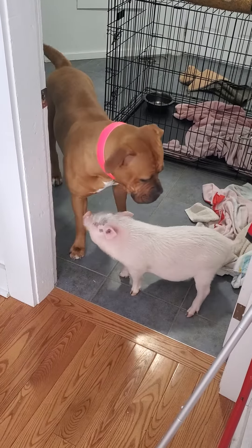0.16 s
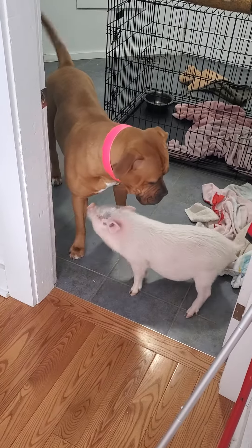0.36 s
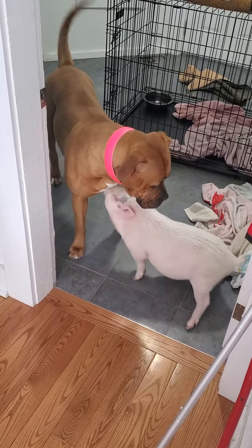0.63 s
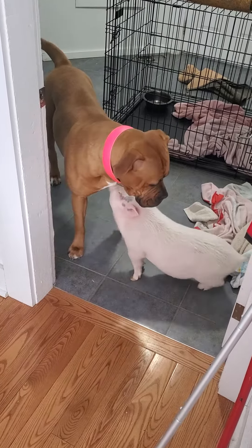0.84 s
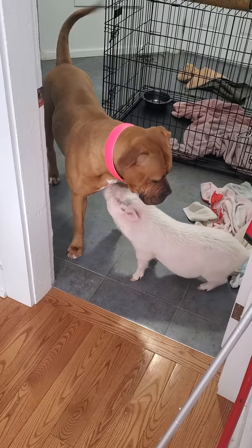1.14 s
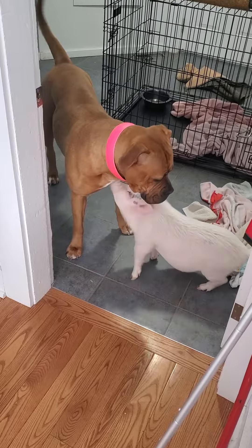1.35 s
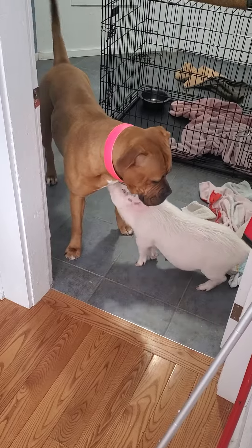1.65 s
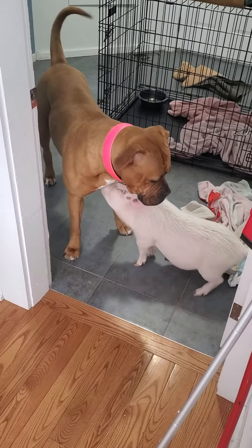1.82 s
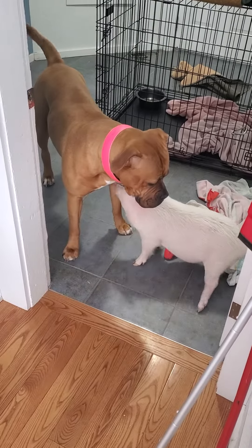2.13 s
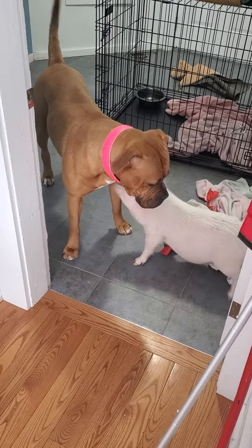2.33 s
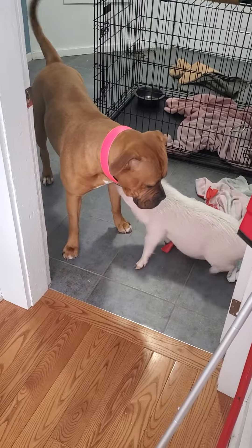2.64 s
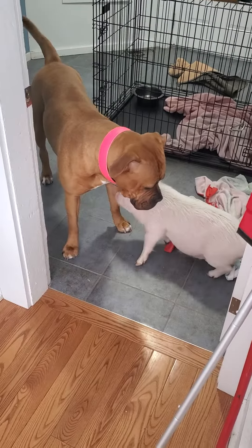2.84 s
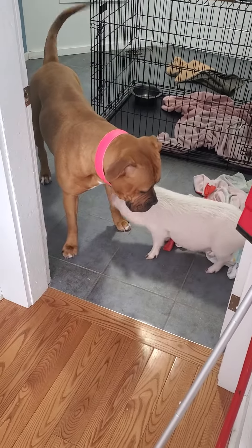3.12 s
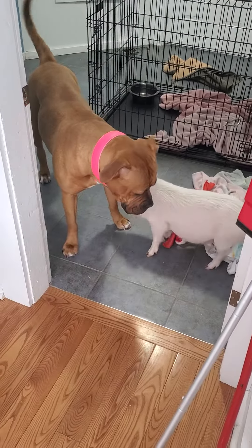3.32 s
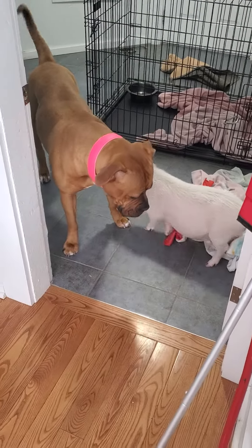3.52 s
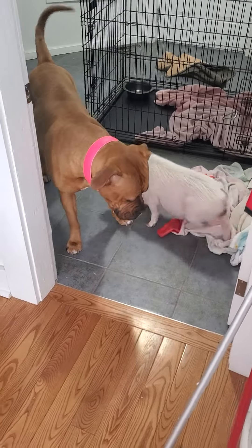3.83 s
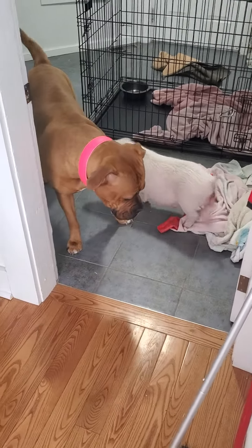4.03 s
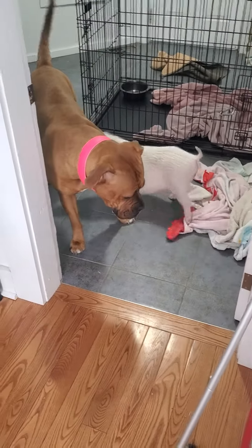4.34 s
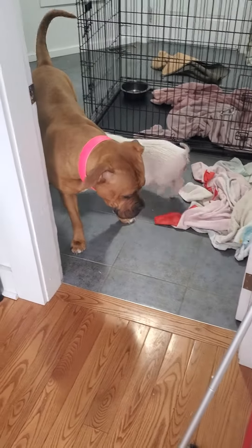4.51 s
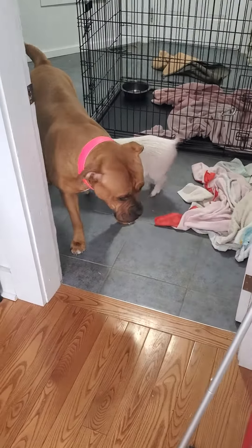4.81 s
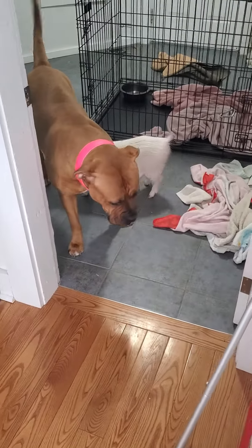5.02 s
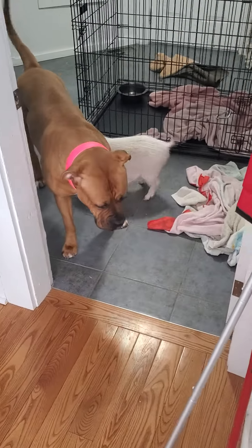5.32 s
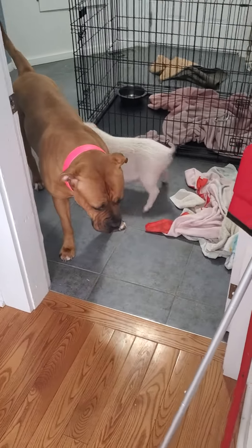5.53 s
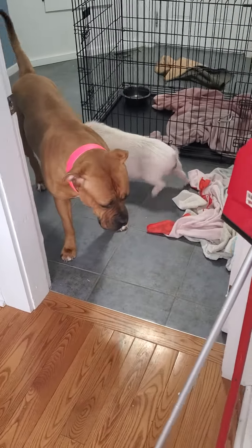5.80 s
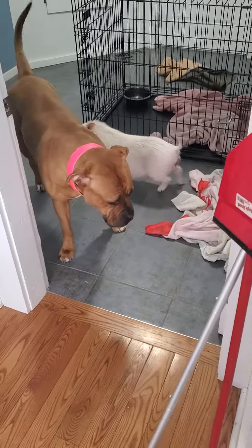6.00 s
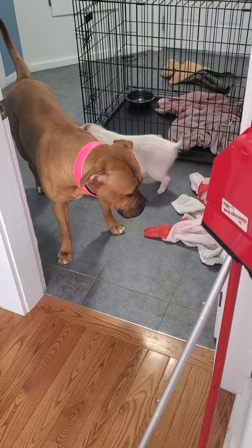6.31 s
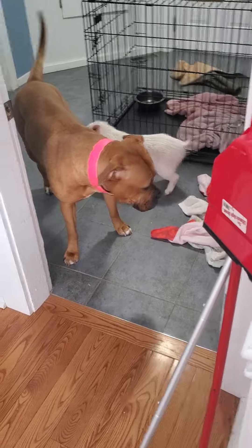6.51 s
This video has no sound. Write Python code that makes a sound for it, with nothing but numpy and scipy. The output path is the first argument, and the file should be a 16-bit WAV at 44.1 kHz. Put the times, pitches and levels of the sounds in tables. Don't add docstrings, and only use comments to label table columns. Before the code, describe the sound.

Close stereo microphone in a small hard tiled room, with quiet low hum, room air and very faint hiss. The first half second is almost still: tiny hoof taps and a soft floor thud. At 0.6-0.9 s come a firm tick, gritty scuff and breathy snorts, with a pinched whistling sniff. Light taps and a scrape follow at 1.25-1.5 s, then soft rustling. A strong sharp sniff comes at 2.25 s, muffled puffs follow, and the loudest hoof strike cracks at 2.74 s with a low thump. After a lull around 3 s, slides, sniffs and quick claw ticks scatter from 3.4 to 4.6 s. A full snort swells at 4.8 s. From 5.4 to 6.1 s, two hard ticks, a scuff, thuds and longer sniffs crowd together, then weak puffs and rustle fade toward 6.6 s.

```python
import sys
import numpy as np
from scipy import signal
from scipy.fft import rfft, irfft
from scipy.io import wavfile
from scipy.ndimage import uniform_filter1d

SR = 44100
rng = np.random.default_rng(int(sys.argv[2]) if len(sys.argv) > 2 else 0)


def master(y):
    cut = np.clip(np.atleast_2d(y).T, -1, 1)
    pcm = np.round(cut * 32767)
    wavfile.write(sys.argv[1], SR, pcm.astype(np.int16))


def elevation(decibels):
    levels = np.asarray(decibels, float)
    return 10 ** (levels / 20)


N = 293823

# t/s, hold/s, level/dB, cloth and chest part/dB rel, thin hiss/dB rel
SLIDES = [(.268, 0.05, -63.5, -4, -12), (.378, 0.037, -53.5, -1, -12.5), (.727, 0.018, -41.5, -9, -17.5),
          (1.253, 0.03, -53, -5.5, -9.5), (1.456, 0.057, -44.5, -8, -14.5), (2.658, 0.0057, -48, -14, -8.5),
          (2.738, 0.0014, -36, 0, -5.5), (3.47, 0.062, -41.5, -13, -15.5), (3.63, 0.026, -43, -14.5, -16),
          (3.741, 0.021, -40, -12, -10.5), (3.811, 0.025, -51.5, -5, -11), (3.891, 0.031, -60, 1, -8),
          (4.076, 0.0051, -52.5, -16, -15), (4.164, 0.039, -48, -14, -9.5), (4.3, 0.038, -51, -11.5, -12.5),
          (4.601, 0.017, -48.5, -4.5, -16.5), (5.189, 0.028, -60, 2, -23), (5.215, 0.013, -54.5, -3, -15.5),
          (5.57, 0.069, -39, -12, -10)]
# t/s, swell/s,
# level/dB, cloth and chest part/dB rel, thin hiss/dB rel
SNORTS = [(.585, 0.0067, -48.5, -6, -16), (1.091, 0.0038, -61.5, -6, -15), (.83, 0.052, -42, -20, -27),
          (2.35, 0.081, -44, 0.5, -12), (2.44, 0.045, -45.5, 5.5, -17), (2.635, 0.035, -49.5, -8, -20),
          (2.74, 0.045, -49.5, -16, -32), (4.31, 0.064, -59, -6, -0.5), (4.63, 0.022, -58.5, 0, -27),
          (4.79, 0.07, -38.5, -6, -16), (4.96, 0.042, -61.5, 3, -17), (5.63, 0.09, -51.5, 2, -6.5),
          (5.87, 0.081, -47, -2.5, -22), (6.01, 0.11, -46.5, -10, -12), (6.238, 0.011, -51.5, -4, -16.5),
          (6.41, 0.1, -55.5, -5.5, -12)]
# t/s, swell/s, level/dB, cloth and chest part/dB rel, thin hiss/dB rel
SNIFFS = [(.775, 0.064, -51, -10, -22), (.815, 0.059, -37.5, -3.5, -10), (1.444, 0.008, -50, -10, -14),
          (2.247, 0.047, -34, -10.5, -14), (3.432, 0.027, -40.5, -8.5, -18),
          (3.99, 0.029, -55.5, -25, -12.5), (4.489, 0.017, -61, -2.5, 2), (4.755, 0.031, -44.5, -21, -12),
          (5.425, 0.035, -52, -13, -8.5), (5.45, 0.086, -41, -13, -13), (5.835, 0.041, -36, -17, -12)]
# t/s, swell/s, level/dB, cloth and chest part/dB rel, thin hiss/dB rel
RUSTLES = [(0.0, 0.042, -62, 9, -3), (.33, 0.052, -76, 1, 1), (.46, 0.15, -69.5, 17.5, 0),
           (.64, 0.048, -63, 10.5, -6), (1.58, 0.035, -85, 14, -18), (1.76, 0.044, -68.5, 6.5, 9),
           (1.86, 0.082, -61, 4.5, 8), (1.95, 0.13, -60.5, -12, 2), (2.03, 0.064, -56, 7, -27),
           (2.54, 0.074, -64.5, 1, -3), (2.59, 0.034, -60.5, 6.5, -5), (2.9, 0.05, -64.5, 13.5, -10),
           (2.98, 0.024, -74.5, -10, 13.5), (4.4, 0.03, -69, -9, 4), (5.71, 0.12, -58, 9, -5),
           (6.17, 0.043, -67, 0, -13), (6.3, 0.058, -64, 3, -3.5), (6.55, 0.055, -59.5, 2.5, -6.5)]
# curve of the swell, fall/dB per s, open-snout part/dB rel, left-right/dB
SLIDE_SHAPE = (0.03, 235, -5.5, 0.5)
SNORT_SHAPE = (0.74, 211, 2.4, 0.84)
SNIFF_SHAPE = (1.28, 202, -6.5, 1.7)
RUSTLE_SHAPE = (0.53, 170, 0.41, 0.72)
# level/dB, cloth/dB rel, open snout/dB rel, hiss/dB rel, left-right/dB
STILL = (-86, 5.5, -17, -1.5, 6)
# f/Hz, level/dB per Hz
AIR = [(180, -28), (300, -12), (520, -9.5), (720, -5.5), (1200, -2.5), (1930, -3.5), (4160, -3.5),
       (7820, -8.5), (16000, -13.5)]
CAVITIES_HZ = [255, 428, 496, 682, 821, 1022, 1299, 1620, 1720, 1975, 2510, 2728, 3990, 3745, 4110, 4290,
               6020]
# t/s, length/s, f/Hz, width/Hz,
# level/dB
WHISTLES = [(.3, .04, 11000, 7000, -63), (.84, .055, 4200, 800, -45), (1.28, .043, 1840, 110, -64),
            (1.61, .093, 1200, 300, -62), (1.648, .065, 1700, 200, -64), (1.77, .06, 10000, 8000, -64),
            (2.283, .03, 4100, 900, -43), (2.62, .02, 7000, 5000, -62), (2.745, .075, 1850, 250, -45),
            (4.492, .06, 4100, 1300, -59), (2.742, .08, 1250, 300, -47), (2.742, .07, 2380, 250, -51),
            (3.457, .035, 4000, 600, -45), (3.743, .02, 4050, 500, -45), (.848, .03, 1740, 120, -52),
            (.366, .008, 1200, 600, -58), (6.09, .06, 1950, 400, -54), (1.092, .03, 2000, 500, -63),
            (4.077, .07, 1650, 250, -59)]
# t/s, peak level/dB, ring f/Hz, left-right/dB, dull part/dB rel
HOOVES = [
    (0.0544, -61, 1620, 6, 3),
    (0.2678, -53, 3220, -5, 4),
    (0.378, -44, 4940, 15, -11),
    (0.7267, -38, 4850, -2, -3),
    (1.2526, -46, 5160, 19, -9),
    (2.7382, -32, 1700, -14, 0),
    (2.7399, -23, 1850, 1, -2),
    (3.8911, -45, 1820, -11, 0),
    (5.903, -32.5, 2220, -5, -1),
]
# t/s, peak level/dB, ring f/Hz, left-right/dB
CLAWS = [(1.2627, -44, 4000, -16), (1.4576, -52, 2160, -1), (2.659, -39, 1610, 10), (3.637, -47, 4530, -7),
         (3.741, -32.5, 4130, 3), (3.8118, -39, 3300, -2), (4.0762, -42.5, 3560, -16.5),
         (4.1645, -31, 3640, -14), (4.3004, -44, 6170, 14), (4.346, -46, 3450, -18),
         (4.4902, -43, 4000, 11.5), (4.602, -36, 3700, -1), (4.9965, -49, 3730, -15),
         (5.189, -63, 3670, -27), (5.2143, -53, 3850, -20), (5.524, -33, 2440, -1), (5.571, -33, 4520, 6),
         (5.957, -39, 8950, -14)]
# t/s, peak level/dB, f/Hz
THUDS = [(0.411, -36.5, 92.4), (0.445, -43, 91), (0.789, -38, 49.4), (1.011, -48, 54.6), (1.296, -41.5, 64),
         (1.33, -48, 90), (1.467, -46, 68.5), (2.087, -47, 107), (2.415, -51, 58), (2.503, -40, 79.5),
         (2.633, -40.5, 76.7), (2.777, -32, 91.9), (3.029, -61, 64.6), (3.613, -36, 57.5),
         (3.85, -42, 60.4), (3.997, -43, 65.4), (4.192, -42, 52), (4.282, -50, 89), (4.884, -58, 46),
         (4.894, -51, 102), (5.534, -43, 51.7), (5.654, -34, 98.5), (5.69, -38, 61.7), (5.7, -43, 171),
         (6.111, -42.5, 73), (6.525, -47.5, 76)]
# t/s, boom level/dB, knock level/dB
SHIFTS = [(0.0, -59, -52.5), (0.279, -77, -53.5), (0.432, -46.5, -55.5), (.63, -77, -49.5),
          (.73, -62, -49.5), (.84, -51.5, -50.5), (1.32, -55.5, -74), (1.91, -68, -55.5), (2.1, -57, -58.5),
          (2.42, -44.5, -56), (2.58, -55, -46.5), (2.67, -49, -72), (2.75, -60, -48.5), (2.8, -46.5, -44.5),
          (3.0, -68, -72), (3.62, -48.5, -62.5), (3.76, -50.5, -63.5), (4.2, -64, -56), (4.34, -51, -55.5),
          (4.64, -57.5, -58), (4.93, -49, -78), (5.27, -76, -62), (5.58, -67, -56), (5.69, -41, -50.5),
          (5.82, -48, -49), (5.99, -46.5, -50), (6.15, -60, -76), (6.55, -52.5, -59.5)]
# f/Hz, T60/s
ROOM_T60 = [(300, 0.26), (1000, 0.23), (3000, 0.24), (7000, 0.057), (14000, 0.028)]
# f/Hz, level/dB
MIC = [(20, -34), (50, -2.5), (90, 1.5), (6800, -1), (7200, -8), (13000, -4.5), (13600, -13.5),
       (15750, -11), (15900, -62)]
# f/Hz, left-right/dB
PORT_BALANCE = [(60, -0.5), (500, -3.5), (1290, 1.5), (2380, -0.5), (4400, 1.5), (8000, -2), (15000, 4.5)]
# f/Hz, left-right likeness (1 = same)
LIKENESS = [(60, 1), (130, 0.85), (290, 0.99), (640, 0.69), (1410, 0.16), (3100, 0.0026), (6820, 0.049),
            (15000, 0.46)]
# f/Hz, level/dB per Hz
FLOOR = [(18, -34), (35, -8), (65, -2), (100, -5.5), (180, -7), (300, -19.5), (450, -21), (4400, -58),
         (9680, -120)]
# f/Hz, level/dB per Hz
HISS = [(4300, -10), (4750, 1), (6850, 4), (7200, -54), (8500, -9), (10500, -17), (13000, -7), (15500, -21)]

EDGES = 150 * 2 ** np.arange(0, 6.9, .4)
STEP = 32
LOWS_LINGER_DB_PER_S, TAIL_LEFT_DB_PER_S = 27, 52
SHIFT_RISE_DB_PER_S, SHIFT_FALL_DB_PER_S = 151, 138
REST_BOOM_DB, REST_KNOCK_DB = -65.5, -69
CLAW_DULL_DB, HOOF_ECHO_DB = -35, -5.5
HUM_HZ, HUM_DB, FLOOR_DB, HISS_DB = 120, -64, -59, -73
DIRECT_SHARE, DIRECT_FROM_HZ = .3, 1000
RIGHT_LAG, LEFT_LAG = 17, 6


def snuffle(patchy_db=1.4, grain_db=1.3, streak_db=-4):
    level_db, cloth_db, open_db, hiss_db, pan_db = moves()
    flutter = grain_db * (.6 * drift(40.0) + drift(220.0))

    def gain_db_at(hz):
        low_share = np.clip(np.log2(1500 / hz) * 1.8, 0, 1)
        high_share = np.clip(np.log2(hz / 4500), 0, 1)
        open_share = np.clip(1 - 1.32 * abs(np.log2(hz / 1800)), 0, 1)
        colour = open_share * (open_db + 5) + low_share * (cloth_db + 5.0) + high_share * (hiss_db + 12.5)
        return colour + flutter + patchy_db * drift(5.3)

    air = stereo_bands(AIR, gain_db_at)
    streaks = 0
    for hz in CAVITIES_HZ:
        streaks = streaks + elevation(3.0 * drift(5.0) - 2) * resonate(air, hz, 30 + 0.01 * hz)
    return elevation(level_db - 1.0) * pan(pan_db) * (0.71 * air + elevation(streak_db) * streaks)


def moves():
    t = np.arange(N // STEP + 2) * STEP / SR
    still_db, *colour_db, still_pan_db = STILL
    total = elevation(still_db) ** 2 * np.ones(len(t))
    parts = total * elevation(np.array(colour_db)[:, None]) ** 2
    side = total * still_pan_db
    kinds = ((SLIDES, SLIDE_SHAPE), (SNORTS, SNORT_SHAPE), (SNIFFS, SNIFF_SHAPE), (RUSTLES, RUSTLE_SHAPE))
    for rows, (curve, fall, open_db, pan_db) in kinds:
        for s, length_s, db, cloth_db, hiss_db in rows:
            after = np.maximum(t - s - length_s, 0)
            swell = np.clip((t - s) / length_s, 0, 1) ** curve * (t > s)
            power = (swell * elevation(db - fall * after)) ** 2
            cloth = cloth_db + LOWS_LINGER_DB_PER_S * after
            total = total + power
            parts = parts + power * elevation(np.array([cloth, open_db + 0 * t, hiss_db + 0 * t])) ** 2
            side = side + power * (pan_db + TAIL_LEFT_DB_PER_S * after)
    total, side, *parts = uniform_filter1d([total, side, *parts], size=3, origin=1)
    level_db, parts_db = 10 * np.log10(total), 10 * np.log10(parts / total)
    return [smooth_up(c) for c in (level_db, *parts_db, side / total)]


def whistles():
    out = np.zeros((2, N))
    puffs = rng.standard_normal((len(WHISTLES), 2, 12000))
    for (s, length_s, hz, width_hz, db), air in zip(WHISTLES, puffs):
        tone = rms_one(resonate(resonate(air, hz, width_hz), hz, width_hz))
        t, at = np.arange(12000) / SR / length_s, round(s * SR)
        out[:, at:at + 12000] += elevation(db) * tone * np.clip(42.0 * t, 0, 1) * np.exp(-t ** 2)
    return out


def ticks(crack_db=-7.0, dull_s=0.0077):
    out, t = np.zeros((2, N)), np.arange(900) / SR
    rows = HOOVES + [(*row, CLAW_DULL_DB) for row in CLAWS]
    for (s, db, hz, pan_db, dull_db), grit in zip(rows, rng.standard_normal((len(rows), 900))):
        ring = .65 * np.sin(2 * np.pi * hz * t) * (t / .0006) ** 4 * np.exp(4 - t / .00015)
        crack = grit * np.exp(-t / .0015) * np.clip(t / .0007, 0, 1)
        crack = elevation(crack_db) * band(crack, 1200, min(4 * hz, 15000), order=1)
        knock = grit * np.exp(-t / dull_s) * np.clip(t / 0.00071, 0, 1)
        knock = elevation(dull_db - 3.5) * band(knock, 410, 1200)
        at = round(s * SR)
        out[:, at:at + 900] += elevation(db + 7.5) * pan(pan_db)[:, None] * (ring + crack + knock)
    return out


def boards(rise_s=0.0056, fall_s=0.036):
    boom_db, knock_db = weight()
    boom, knock = rng.standard_normal((2, 2, N))
    out = elevation(boom_db - 1) * rms_one(band(boom.sum(0) + .7 * boom, 45, 88))
    out = out + elevation(knock_db - 4.0) * rms_one(band(knock.sum(0) + .5 * knock, 126, 303))
    t = np.arange(int(.3 * SR)) / SR
    envelope = (1 - np.exp(-t / rise_s)) * np.exp(-t / fall_s)
    for (s, db, hz), shift in zip(THUDS, rng.normal(0, 0.057, len(THUDS))):
        swing = np.sin(2 * np.pi * hz * t + shift * np.array([[1], [-1]])) * envelope
        at = round(s * SR)
        out[:, at:at + len(t)] += elevation(db - 3.0) * swing[:, :N - at]
    return out


def weight():
    t = np.arange(N // STEP + 2) * STEP / SR
    power = elevation(np.array([[REST_BOOM_DB], [REST_KNOCK_DB]])) ** 2
    for s, *db in SHIFTS:
        away_db = np.maximum(SHIFT_RISE_DB_PER_S * (s - t), SHIFT_FALL_DB_PER_S * (t - s))
        power = power + elevation(np.array(db)[:, None] - away_db) ** 2
    return [smooth_up(c) for c in 10 * np.log10(power)]


def room(x):
    t = np.arange(int(.6 * SR)) / SR
    white = rng.standard_normal((2, len(t))) * np.clip((t - .002) / 0.00011, 0, 1)
    tail = 0
    for low, high in zip(EDGES[::2], EDGES[2::2]):
        t60 = at_hz(ROOM_T60, np.sqrt(low * high))
        tail = tail + band(white, low, high) * elevation(-60 * t / t60)
    tail = tail / np.sqrt(np.sum(tail ** 2) / 2)
    return signal.fftconvolve(x.mean(0, keepdims=True), tail, axes=1)[:, :N]


def arrive(x):
    return np.array([x[0], np.roll(x[1], RIGHT_LAG)])


def microphone(x):
    hz = np.maximum(np.fft.rfftfreq(N, 1 / SR), 1)
    return irfft(rfft(x) * elevation(at_hz(MIC, hz)) * pan(at_hz(PORT_BALANCE, hz)), N)


def background():
    hum_gain = np.sqrt(2) * elevation(HUM_DB + 2.0 * drift(3.6))
    hum = hum_gain * np.sin(2 * np.pi * HUM_HZ * np.arange(N) / SR)
    return hum + elevation(FLOOR_DB - 7.0) * steady_noise(FLOOR) + elevation(HISS_DB) * steady_noise(HISS)


def steady_noise(spectrum):
    hz = np.maximum(np.fft.rfftfreq(N, 1 / SR), 1)
    mid, side = rfft(rng.standard_normal((2, N)))
    gain = elevation(at_hz(spectrum, hz)) * (hz < spectrum[-1][0])
    return rms_one(irfft(gain * spread(mid, side, np.clip(at_hz(LIKENESS, hz), -1, 1)), N))


def stereo_bands(spectrum, gain_db_at):
    out, power, white = 0, 0, rng.standard_normal((2, 2, N))
    for k, (low, high) in enumerate(zip(EDGES, EDGES[1:])):
        hz = np.sqrt(low * high)
        mid, side = band(white[k % 2], low, high)
        gain = elevation(at_hz(spectrum, hz))
        if hz < DIRECT_FROM_HZ:
            pair = spread(mid, side, np.clip(at_hz(LIKENESS, hz), -1, 1))
        else:
            pair = arrive(spread(mid, side, DIRECT_SHARE))
        out = out + gain * elevation(gain_db_at(hz)) * pair
        power += gain ** 2 * (high - low) * 2 / SR
    return out / np.sqrt(power)


def spread(mid, side, alike):
    return np.sqrt(1 + alike) * mid + np.sqrt(1 - alike) * side * [[1], [-1]]


def drift(rate):
    r = np.exp(-80 * np.pi * rate / SR)
    slow = signal.lfilter([1], [1, -2 * r, r * r], rng.standard_normal(N // 40 + 2002))[2000:]
    return np.interp(np.arange(N) / 40, np.arange(len(slow)), rms_one(slow))


def resonate(x, hz, width_hz):
    r = np.exp(-np.pi * width_hz / SR)
    poles = [1, -2 * r * np.cos(2 * np.pi * hz / SR), r * r]
    return signal.lfilter(np.array([1, 0, -1]) * (1 - r * r) / 2, poles, x)


def band(x, low_hz, high_hz, order=2):
    return signal.sosfilt(signal.butter(order, [low_hz, high_hz], "band", fs=SR, output="sos"), x)


def pan(db):
    return elevation(np.array([db / 2, -db / 2]))


def at_hz(points, hz):
    table_hz, values = np.array(points).T
    return np.interp(np.log(hz), np.log(table_hz), values)


def smooth_up(curve):
    return np.interp(np.arange(N) / STEP, np.arange(len(curve)), curve)


def rms_one(x):
    return x / np.sqrt(np.mean(x ** 2) + 1e-20)


def scene():
    air = snuffle() + whistles()
    hoof = arrive(ticks())
    left, right = boards()
    floor = np.array([elevation(0.9) * np.roll(left, LEFT_LAG), right])
    echo = room(elevation(-8.0) * air + elevation(HOOF_ECHO_DB) * hoof)
    return microphone(air + hoof + echo + floor) + background()


def low_pass(x):
    return signal.sosfilt(signal.butter(12, 16360, fs=SR, output="sos"), x)


def record(dry):
    return low_pass(dry)


dry = scene()
out = record(dry)
master(out)
```